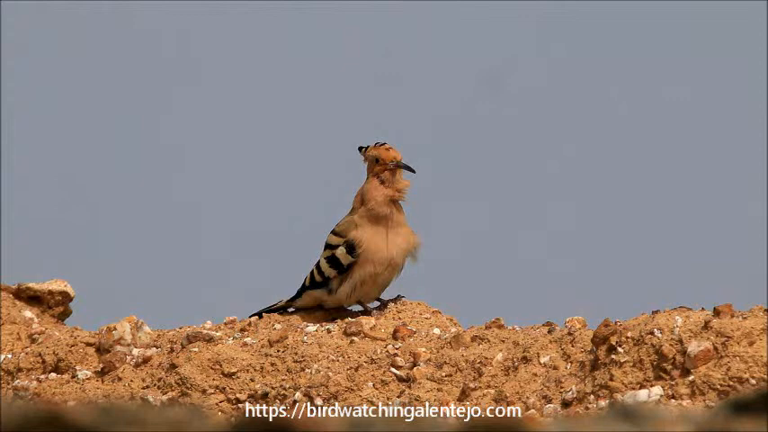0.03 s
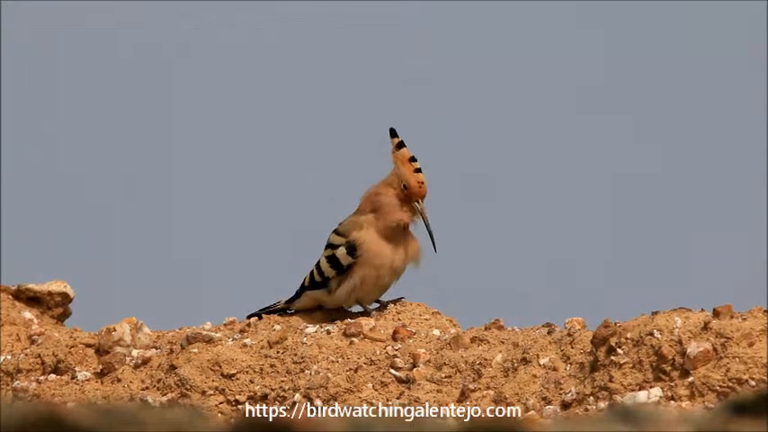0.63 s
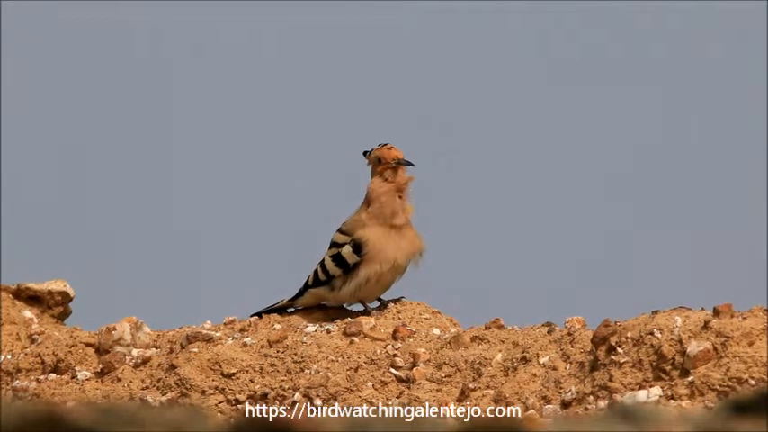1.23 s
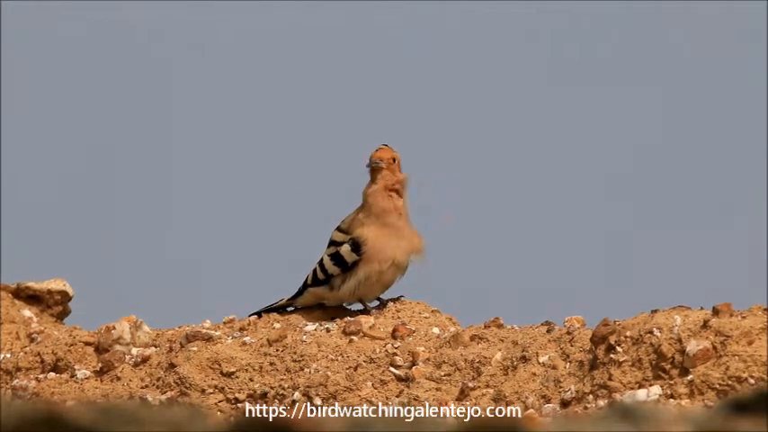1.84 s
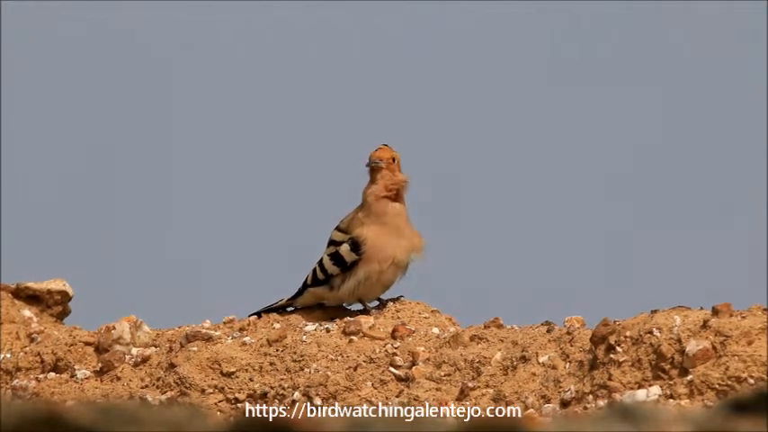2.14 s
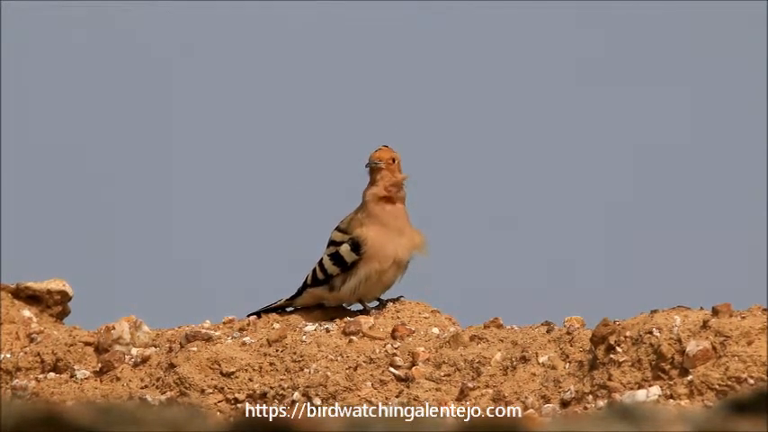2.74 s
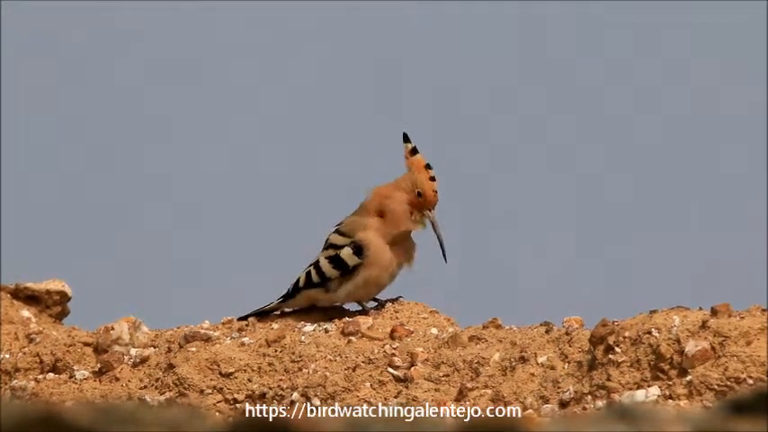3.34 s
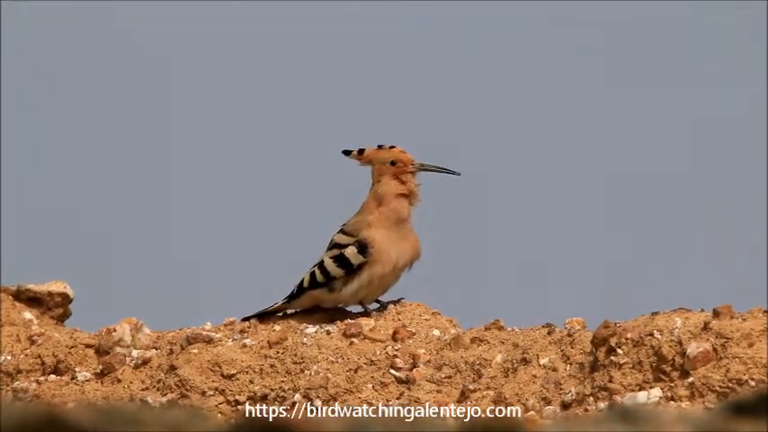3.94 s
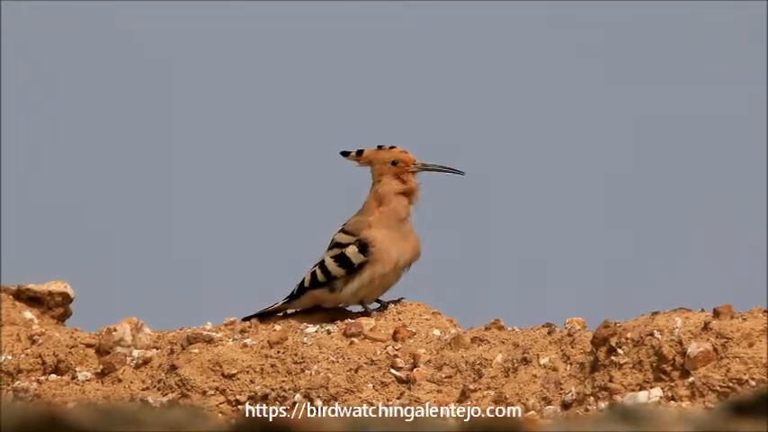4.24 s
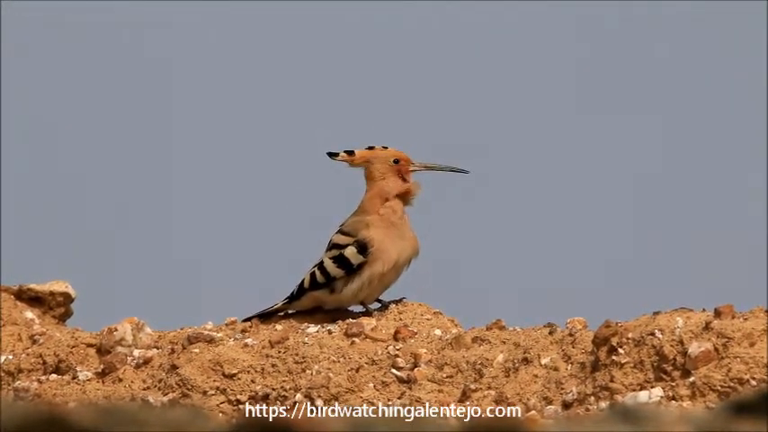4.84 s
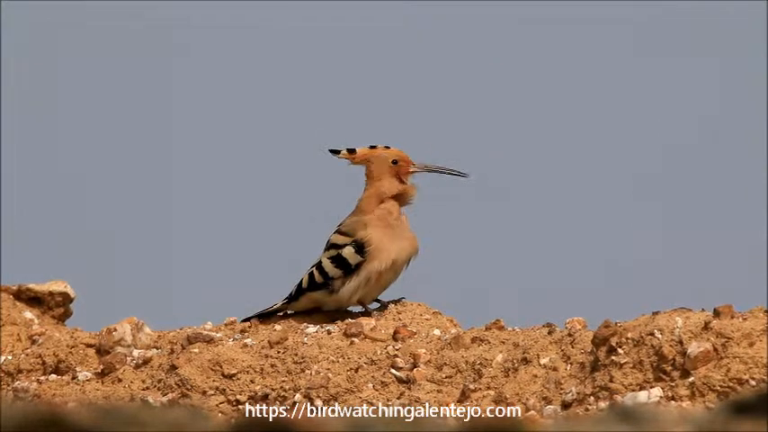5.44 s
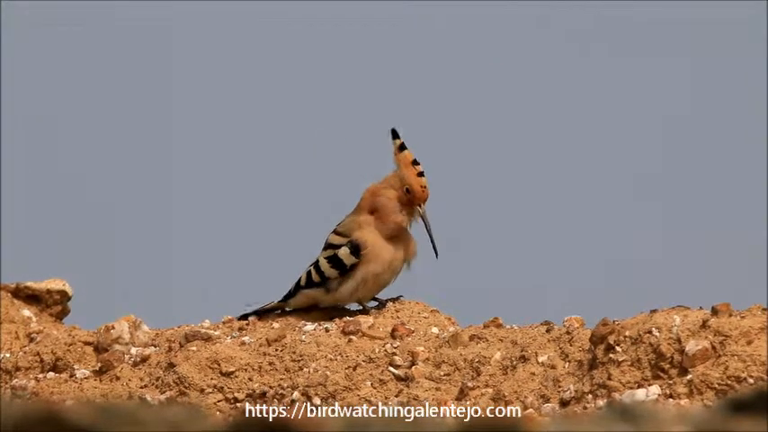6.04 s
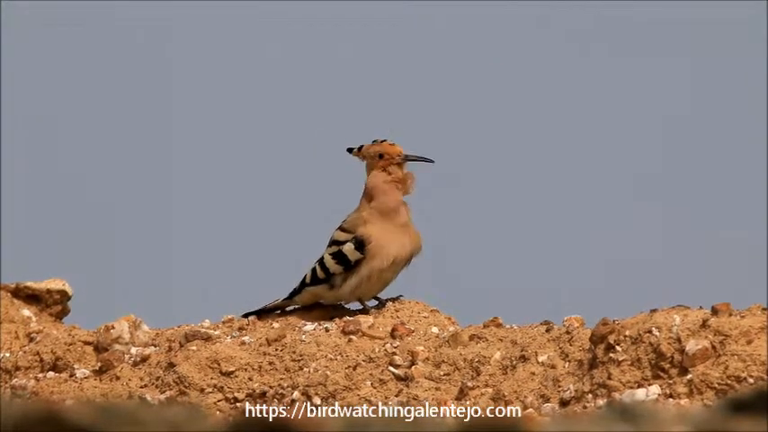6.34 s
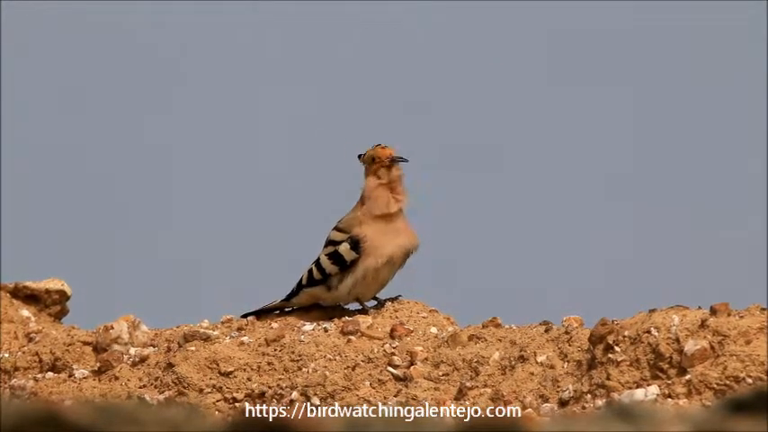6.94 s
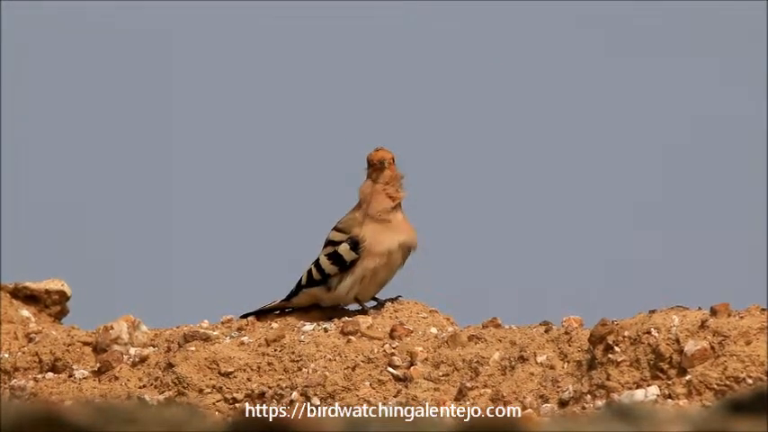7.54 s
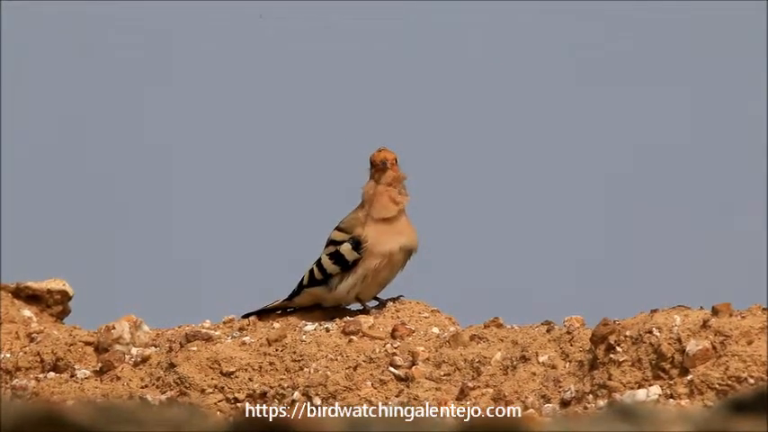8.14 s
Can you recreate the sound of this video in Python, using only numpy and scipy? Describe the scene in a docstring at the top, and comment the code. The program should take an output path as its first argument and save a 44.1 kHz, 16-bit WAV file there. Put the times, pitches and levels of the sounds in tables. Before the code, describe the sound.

Faint low wind and an even hiss run throughout in open country, with a barely audible ringing like distant herd bells. At about 0.6 seconds a hoopoe calls from straight ahead: three quick, soft, hollow hoots, oop-oop-oop, lasting half a second together. Each hoot is an almost pure tone that scoops slightly upward, with a light throb from short echoes off nearby walls. The same call repeats at about 3.2 and 5.9 seconds, and these calls are clearly the loudest sounds. From 3.4 to 4.6 seconds a far songbird gives a faint, high jangle, while dry grass stirs softly a few times between 3.9 and 4.7 seconds. A thin, distant chirp comes at 6.5 seconds. One faint, dull, far knock sounds at about 7.5 seconds, and the wind and hiss carry on to the end at around 8 seconds.

```python
"""Open country by an earth wall, where a hoopoe gives three soft "oop-oop-oop" calls.
Each hoot scoops up into a nearly pure tone; echoes from nearby walls beat against the gliding pitch
and make it throb. Behind the bird lie low wind, an even hiss and a faint ring like distant herd bells.
A far songbird chirps and jangles, dry grass stirs briefly, and one dull knock comes near the end."""
import sys
import numpy as np
from scipy import signal
from scipy.fft import rfft, irfft, next_fast_len
from scipy.io import wavfile
from scipy.ndimage import map_coordinates

SR = 44100
rng = np.random.default_rng(int(sys.argv[2]) if len(sys.argv) > 2 else 0)


def bounce(signal):
    """Save signal as a 16-bit WAV file at the path given by the first command-line argument."""
    frames = np.transpose(np.atleast_2d(signal))
    limited = np.clip(frames, -1, 1)
    pcm = np.round(limited * 32767).astype(np.int16)
    wavfile.write(sys.argv[1], SR, pcm)


N = 360738


def amp(db):
    """Decibels to gain."""
    return 10 ** (np.asarray(db) / 20)


def unit(x):
    """Scale to rms 1."""
    return x / np.sqrt(np.mean(x ** 2) + 1e-20)


def clock():
    """The time of every sample, in seconds."""
    return np.arange(N) / SR


def along(points, hz):
    """Read a curve of (Hz, value) points on a log frequency axis."""
    freqs, values = np.transpose(points)
    return np.interp(np.log(hz + 1), np.log(freqs + 1), values)


def eq(points):
    """An EQ curve through (Hz, dB) points, as gain against frequency."""
    return lambda hz: amp(along(points, hz))


def wobble(rate):
    """A smooth random curve, rate knots a second."""
    knots = rng.standard_normal(int(N * rate / SR) + 4)
    return map_coordinates(knots, [clock() * rate])


def filtered(x, response):
    """Shape x with a frequency response."""
    size = next_fast_len(N + SR // 2)
    return irfft(rfft(x, size) * response(np.fft.rfftfreq(size, 1 / SR)), size)[..., :N]


# Stereo image of the noise layers. Each row: frequency in Hz, left-right correlation (1 is mono).
STEREO_LIKENESS = [(50, 0.92), (110, 1), (200, 0.6), (400, 0.53), (800, 0.59), (1600, 0.047),
                   (4000, 0.0033)]

def diffuse(gain):
    """Shaped stereo noise of rms 1 from all around: narrow in the bass, wide in the treble."""
    def response(hz):
        spread = np.arccos(np.clip(along(STEREO_LIKENESS, hz), -1, 1)) / 2
        return gain(hz) * np.array([np.cos(spread), np.sin(spread)])
    mid, side = filtered(rng.standard_normal((2, N)), response)
    return unit(np.array([mid + side, mid - side]))


# Tone of the wind and of the hiss. Each row: frequency in Hz, relative level in dB.
WIND_EQ = [(15, -35), (30, -13), (39, -10), (49, 2), (62, -2.5), (98, -3.5), (150, -10), (184, -6.5),
           (237, -13), (278, -14), (400, -17), (520, -24), (880, -120)]
HISS_EQ = [(180, -28), (300, -8), (321, -19.5), (360, -7), (493, -7), (572, -4.5), (809, -8), (1000, -9),
           (1820, -13), (2330, -13.5), (7530, -18), (12800, -23), (15600, -26)]

def air():
    """The bed: low wind that swells a little, under an even hiss."""
    wind = amp(-57.0 + 0.47 * wobble(1.53) + 1.1 * wobble(9)) * diffuse(eq(WIND_EQ))
    hiss = amp(-57.5 + 0.2 * wobble(2.12)) * diffuse(eq(HISS_EQ))
    return wind + hiss


# The bells' ringing bands. Each row: centre in Hz, half-width in Hz, relative level in dB.
BELL_BANDS = [(578, 13.7, -68), (720, 25, -76), (998, 16, -75.5), (1311, 23, -73.5)]
# How strongly the bells carry. Each row: time in seconds, level in dB before the trim.
BELL_FADER = [(0.35, -71), (1.42, -70), (2.35, -67), (3.97, -71), (4.28, -65.5), (4.9, -69.5), (6.9, -72.5),
              (7.9, -71.1)]

def herd_bells(trim_db=2):
    """Distance blurs the ringing into narrow bands that come and go."""
    def ring(hz):
        return sum(amp(db) / np.sqrt(width) / (1 + ((hz - centre) / width) ** 2)
                   for centre, width, db in BELL_BANDS)
    fader_db = np.interp(clock(), *np.transpose(BELL_FADER))
    return amp(trim_db + fader_db + 2.3 * wobble(5.7)) * diffuse(ring)


SCOOP_HZ, SCOOP_S, END_LIFT_HZ = 166, .0118, 25  # scoop from below, upward flick at the cut-off
ATTACK_S, ATTACK_POWER, RELEASE_S = .1, .61, .0255  # slow swell, quick cut-off
THIRD_DB = -12  # third harmonic against the second

def hoot(length, hz, glide_hz_per_s, overtone_db):
    """One hoot swells as its pitch scoops up; the inflated throat passes little but the fundamental."""
    t = np.arange(round(length * SR)) / SR
    closing = np.maximum(1 - (length - t) / RELEASE_S, 0)
    scoop = SCOOP_HZ * np.exp(-t / SCOOP_S)
    pitch = hz + glide_hz_per_s * t - scoop + END_LIFT_HZ * closing ** 2
    phase = 2 * np.pi * np.cumsum(pitch) / SR
    envelope = np.minimum(t / ATTACK_S, 1) ** ATTACK_POWER * (1 - closing)
    richness = amp(overtone_db) * np.sin(np.pi * t / length) ** 2  # richest in mid-hoot
    overtones = np.sin(2 * phase) + amp(THIRD_DB) * np.sin(3 * phase)
    return envelope * (np.sin(phase) + richness * overtones)


# The hoopoe's cues. Each row: start in seconds, level in dB.
CALLS = [(.5862, -35.5), (3.1927, -36.5), (5.8505, -35.5)]
# The hoots of a call. Each row: offset in seconds, length in seconds, base pitch in Hz, glide in Hz
# per second, level in dB against the call, peak second harmonic in dB against the fundamental.
CALL_HOOTS = [(0, .128, 636, 347, -1, -25), (.1876, .139, 641.5, 408, 0, -21.5),
              (.3818, .137, 637, 532, 0, -22.5)]

def hoopoe():
    """Every call repeats the same three hoots, each gliding up faster than the last."""
    voice = np.zeros(N)
    for start, call_db in CALLS:
        for offset, length, hz, glide, db, overtone_db in CALL_HOOTS:
            note = amp(call_db + db) * hoot(length, hz, glide, overtone_db)
            voice[round((start + offset) * SR):][:len(note)] += note
    return voice


# Slaps off the walls. Each row: delay in seconds, level in dB, side (1 left, 0 ahead, -1 right).
WALL_SLAPS = [(.00929, -7.3, 0), (.02356, -22, -1), (.03923, -10.8, 1), (.04686, -9.8, -1),
              (.05315, -15, 1), (.0575, -17.3, 1), (.0907, -18, 0), (.15022, -26, 1)]
# A wall's treble roll-off. Each row: frequency in Hz, gain in dB.
WALL_EQ = [(850, 0), (1300, -9)]

def wall_echoes(voice, lead_s=0.00018):
    """Each wall returns one dulled, delayed copy; the channel on its side hears it first."""
    t = clock()
    lead = lead_s * np.array([[1], [-1]]) / 2
    dulled = filtered(voice, eq(WALL_EQ))
    return sum(amp(db) * np.interp(t - delay + side * lead, t, dulled) for delay, db, side in WALL_SLAPS)


def ground_scatter(x, t60, build_s):
    """Rough ground and scrub scatter a short stereo reverb tail."""
    t = np.arange(SR) / SR
    tail = rng.standard_normal((2, SR)) * amp(-60 * t / t60) * (1 - np.exp(-t / build_s))
    return signal.fftconvolve(x[None], tail / np.linalg.norm(tail[0]), axes=1)[:, :N]


def chirp(start, hz, db, flutter, length_s=0.0298):
    """One thin songbird note; flutter is its random waver as a share of the pitch."""
    count = round(length_s * SR)
    progress = np.linspace(0, 1, count)
    waver = np.interp(progress, np.linspace(0, 1, 9), rng.standard_normal(9))
    phase = 2 * np.pi * np.cumsum(hz * (1 + flutter * waver)) / SR
    envelope = np.sqrt(np.abs(np.sin(np.pi * progress)))
    note = np.zeros(N)
    note[round(start * SR):][:count] = envelope * np.sin(phase)
    return amp(db) * note


JANGLE_START_S, JANGLE_LENGTH_S, JANGLE_DB = 3.4, 1.2, -69.5
JANGLE_HZ, JANGLE_SPREAD_OCTAVES = 5700, .17
# The songbird's clear chirps. Each row: start in seconds, pitch in Hz, level in dB.
CLEAR_CHIRPS = [(.87, 5100, -73), (6.466, 5280, -65), (6.47, 4550, -67)]

def songbird(jangle_notes=48):
    """A far bird: a few clear chirps, and a jangle of overlapping notes, loudest in its middle."""
    song = sum(chirp(start, hz, db, flutter=0) for start, hz, db in CLEAR_CHIRPS)
    for progress in np.arange(jangle_notes) / jangle_notes:
        start = JANGLE_START_S + progress * JANGLE_LENGTH_S
        hz = JANGLE_HZ * 2 ** (JANGLE_SPREAD_OCTAVES * rng.standard_normal())
        song += np.sqrt(np.sin(np.pi * progress)) * chirp(start, hz, JANGLE_DB, flutter=0.059)
    return song + amp(-15) * ground_scatter(song, t60=.2, build_s=.01)


def swell(start, length):
    """A rounded fade in and out."""
    progress = np.clip((clock() - start) / length, 0, 1)
    return np.sqrt(np.abs(np.sin(np.pi * progress)))


# Stirs in the grass. Each row: start in seconds, length in seconds, level in dB.
GRASS_STIRS = [(3.855, 0.17, -62.5), (4.264, 0.088, -62), (4.38, 0.15, -62), (4.52, 0.2, -61.5)]

def dry_grass():
    """Dry stalks brush together in a few grainy stirs."""
    envelope = sum(amp(db) * swell(start, length) for start, length, db in GRASS_STIRS)
    grain = unit(amp(2.0 * wobble(300)))
    rustle = diffuse(eq([(500, -21), (1400, 0), (3000, -1), (9000, -5), (15000, -11)]))
    return envelope * grain * rustle


def knock(start, db, t60):
    """One dull, far knock, spread out by the ground."""
    age = np.maximum(clock() - start, 0)
    envelope = (1 - np.exp(-age / .002)) * amp(-60 * age / t60)
    body = diffuse(eq([(150, -20), (500, 0), (1300, 0), (2200, -16), (5000, -40)]))
    return amp(db) * envelope * body


def scene():
    """The mix: the hoopoe dead centre, its echoes, and the open country behind."""
    voice = hoopoe()
    calls = voice + wall_echoes(voice) + amp(-25) * ground_scatter(voice, t60=.45, build_s=0.016)
    return calls + air() + herd_bells() + dry_grass() + songbird() + knock(7.488, db=-56.5, t60=0.37)


START_S, TOP_HZ = .157, 15760

def record(dry):
    """The master: a moment of silence at the head, and a steep cut of the highest treble."""
    return filtered(dry * (clock() > START_S), lambda hz: hz < TOP_HZ)


dry = scene()
out = record(dry)
bounce(out)
```